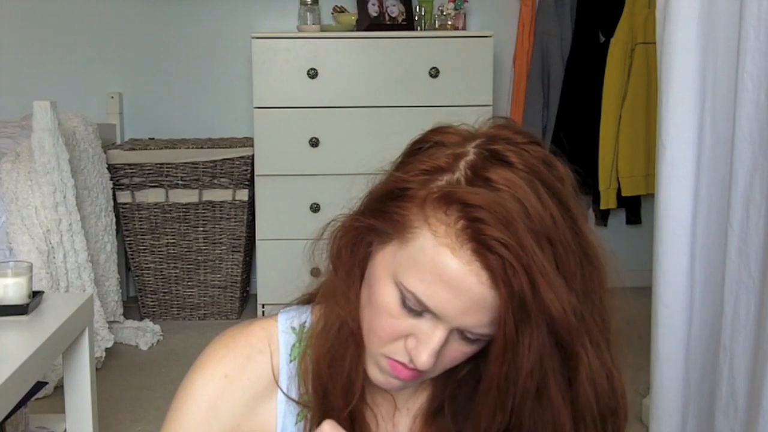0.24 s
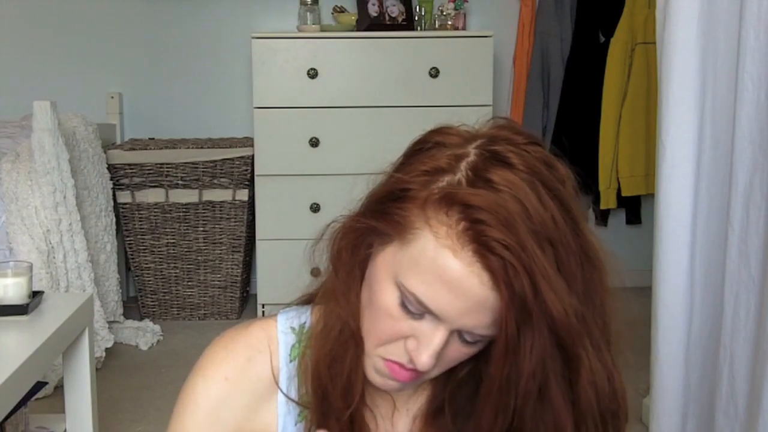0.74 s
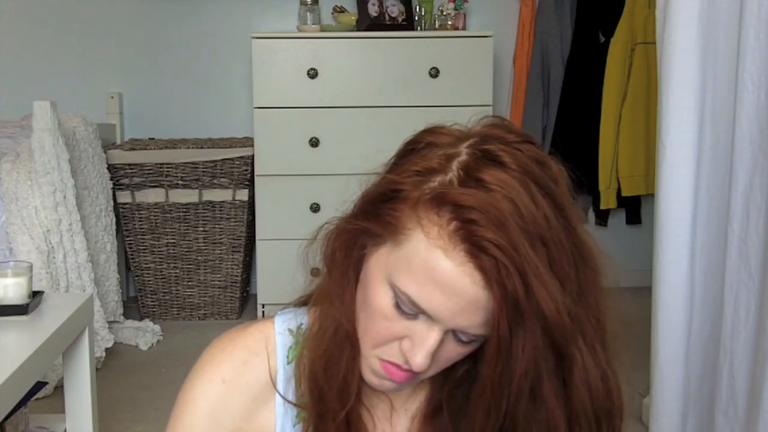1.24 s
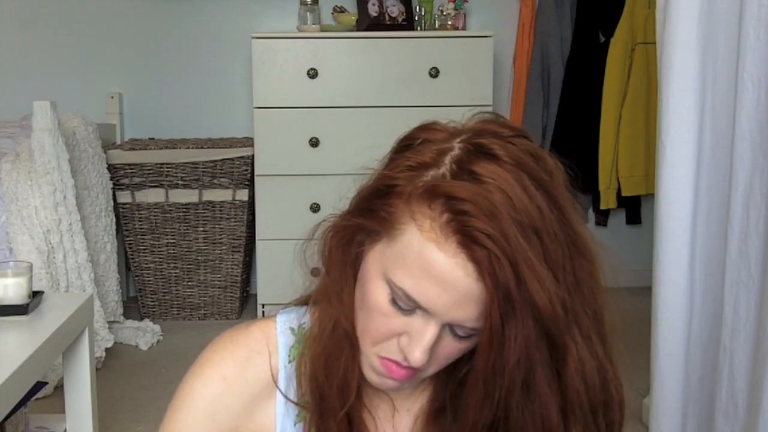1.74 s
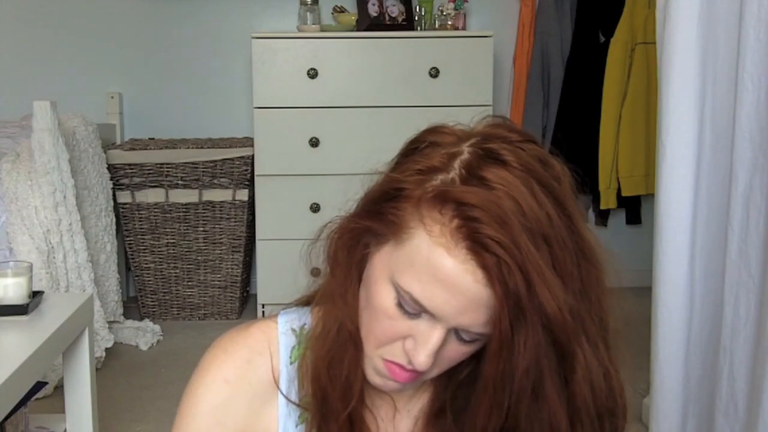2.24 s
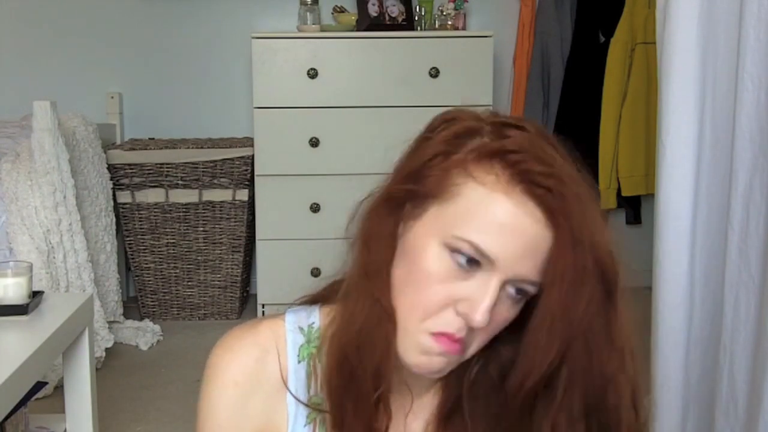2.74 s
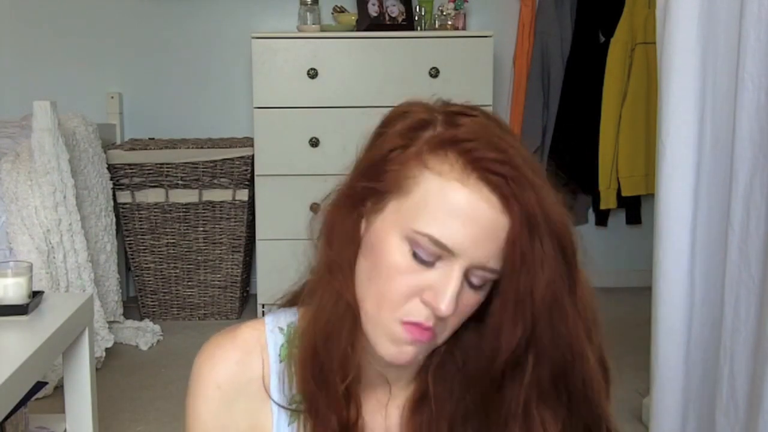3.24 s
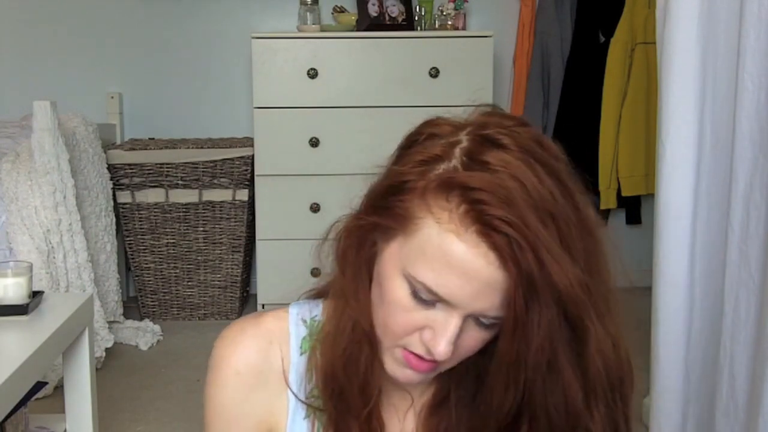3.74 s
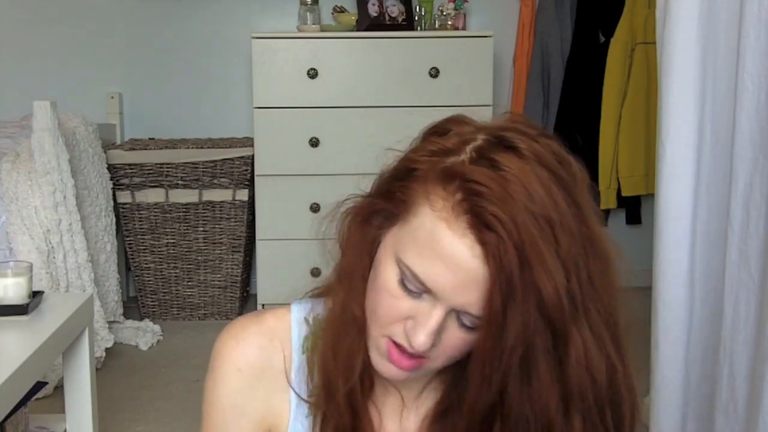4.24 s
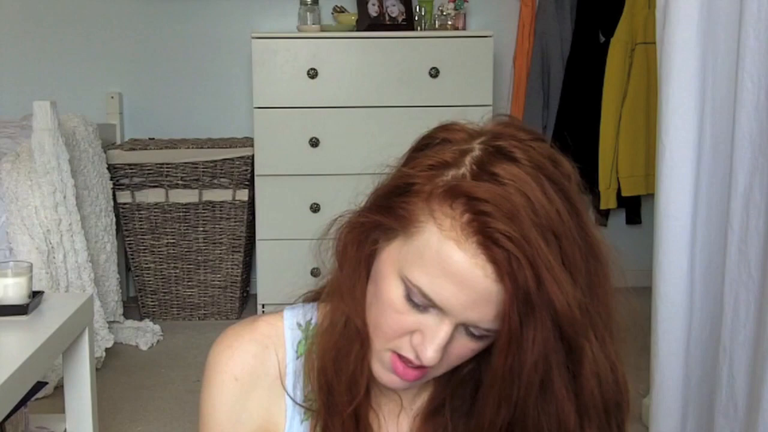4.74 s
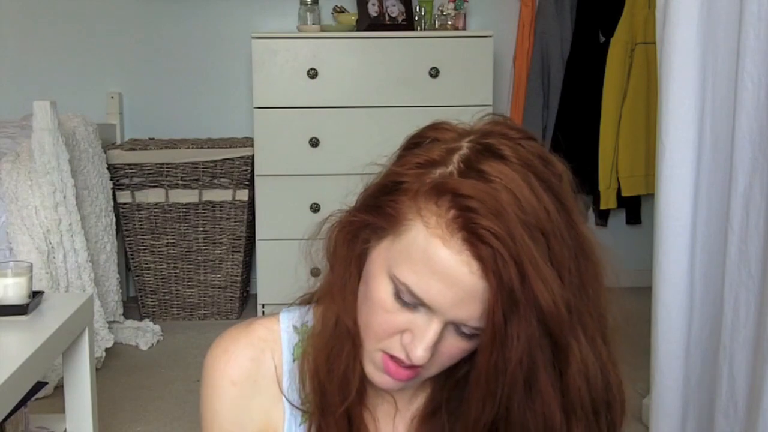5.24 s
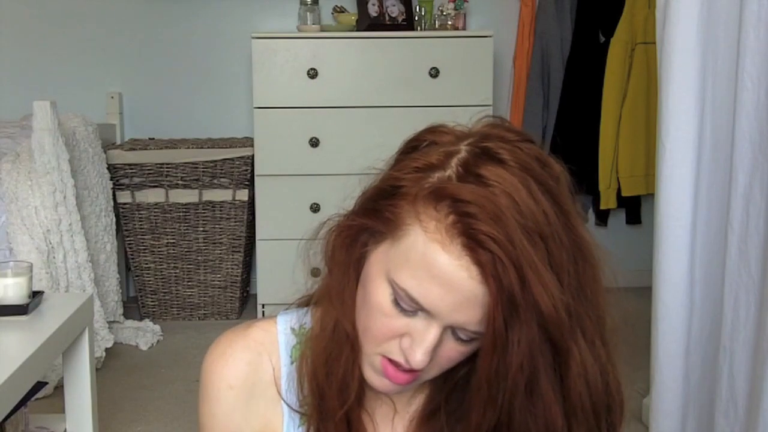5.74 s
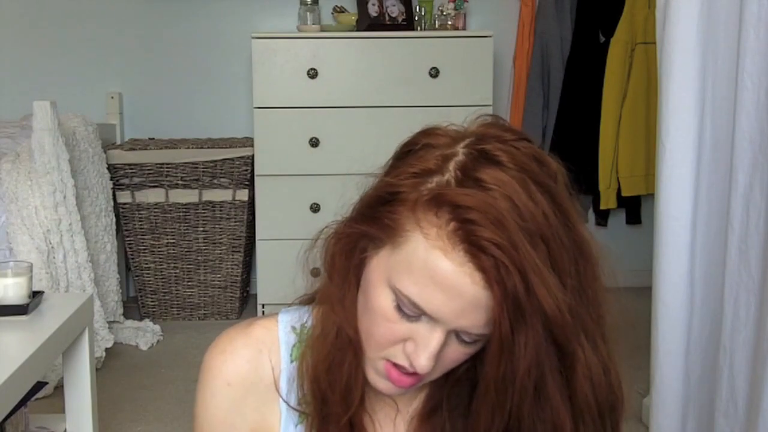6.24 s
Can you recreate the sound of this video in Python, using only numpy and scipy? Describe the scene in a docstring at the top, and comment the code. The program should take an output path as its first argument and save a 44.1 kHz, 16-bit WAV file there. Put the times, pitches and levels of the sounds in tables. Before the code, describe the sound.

Dry, gritty buffing of nails, thin and bright, runs at about thirty tiny strokes a second in bursts under half a second long. After a nearly silent pause it comes back louder, ticks once clearly, breaks into spaced flicks, then returns to short bouts until the end. The microphone is near, the bedroom barely echoes, and a faint rumble, wavering whistle and far engine drone sit underneath.

```python
"""A nail buffer scrubs fingernails in very quick short strokes, heard close up in a small quiet bedroom.
Grit grains catch on the nail and ring the foam block and the nail plate; each grip changes the colour.
Now and then the block's edge ticks against the nail tip. Near reflections and a short tail follow both.
Behind: filtered-noise boom, rumble and 1 kHz whistle, sliding sines for far traffic, a steady sine buzz
with a thin high whine, shaped noise for microphone hiss and a faint low noise that differs left and right."""
import sys
import numpy as np
from scipy import signal
from scipy.fft import rfft, irfft
from scipy.io import wavfile
from scipy.ndimage import uniform_filter1d

SR = 44100
rng = np.random.default_rng(int(sys.argv[2]) if len(sys.argv) > 2 else 0)


def wrap_up_sound(samples):
    """Save the sound to the file named by the first command line argument, as 16-bit audio."""
    columns = np.atleast_2d(samples).T
    # keep every value between -1 and 1, then stretch to whole-number steps
    tamed = np.clip(columns, -1, 1)
    steps = np.round(tamed * 32767).astype(np.int16)
    wavfile.write(sys.argv[1], SR, steps)


N = 285768  # samples in the scene


def gain_of(db):
    """Amplitude factor of a level in dB."""
    return 10 ** (np.asarray(db) / 20)


def evened(x):
    """The signal brought to an rms of 1."""
    return x / np.sqrt(np.mean(x ** 2) + 1e-20)


def read(points, hz):
    """A curve read off between its points along log frequency."""
    f, value = np.transpose(points)
    return np.interp(np.log(hz + 1), np.log(f + 1), value)


def coloured(spectrum):
    """Noise whose power per Hz follows the spectrum above 18 Hz."""
    hz = np.fft.rfftfreq(N, 1 / SR)
    white = rfft(rng.standard_normal(N))
    shaped = white * gain_of(read(spectrum, hz)) * (hz > 18)
    return irfft(shaped, N) * np.sqrt(SR / 2)  # white noise spreads its power over SR / 2


def narrow(noise, hz, width):
    """Noise through two equal two-pole resonances in a row, leaving a band that wavers around one pitch."""
    peak = signal.iirpeak(hz, hz / width, SR)
    return evened(signal.lfilter(*peak, signal.lfilter(*peak, noise)))


def body(groups, size=512):
    """Causal ring of mode groups (modes, dB, pitch factor): powers add, each group at its own level."""
    hz = np.abs(np.fft.fftfreq(size, 1 / SR))
    power = 1e-16
    for modes, db, factor in groups:
        peaks = sum(gain_of(2 * d) / (1 + ((hz - f * factor) / w) ** 2) ** 2 for f, w, d in modes)
        power = power + gain_of(2 * db) * peaks / peaks.mean()
    # minimum phase: the ring starts at once and dies away
    minimum_phase = np.exp(signal.hilbert(np.log(power) / 2).conj())
    return np.fft.ifft(minimum_phase).real[:size // 2]


# Microphone hiss shared by both channels. Each row: frequency in Hz, level in dB per Hz.
HISS_SPECTRUM = [(300, -100), (1000, -101), (2000, -103), (4000, -106), (8000, -110), (11000, -113),
                 (14000, -114), (15700, -117)]


def hiss():
    """Microphone noise, the same in both channels, sloping down towards the treble."""
    return coloured(HISS_SPECTRUM)


# Faint low noise of opposite sign left and right, fading out towards the treble.
# Each row: frequency in Hz, level in dB per Hz.
SIDE_NOISE_SPECTRUM = [(30, -89), (100, -92.5), (270, -95.5), (500, -105), (1280, -114), (2500, -122),
                       (4000, -135), (15500, -145)]


def side_noise():
    """Faint low noise of opposite sign left and right, fading out towards the treble."""
    return coloured(SIDE_NOISE_SPECTRUM) * np.array([[1], [-1]])


# Steady electrical buzz and high whine. Each row: frequency in Hz, level in dB rms.
BUZZ_TONES = [(239.8, -62), (938, -83), (12107.8, -89), (12227.6, -85), (12347.3, -88), (13906, -95),
              (14866, -93)]


def electrical_buzz():
    """Steady sines with random starting phases."""
    t = np.arange(N) / SR
    buzz = np.zeros(N)
    for hz, db in BUZZ_TONES:
        phase = 2 * np.pi * (hz * t + rng.random())
        buzz += gain_of(db) * np.sqrt(2) * np.sin(phase)  # root 2 turns rms into peak
    return buzz


# Level of the low noise over time: randomly wandering deep boom, nearly steady rumble.
# Each row: time in seconds, deep boom in dB rms, rumble in dB rms.
LOW_NOISE_LEVELS = [(0, -59.5, -55), (1.2, -59.5, -54.5), (2.0, -62.5, -53), (3.1, -51, -52),
                    (3.7, -58, -51.5), (4.2, -58.5, -51.5), (4.8, -53.5, -53), (5.5, -57, -53),
                    (6.48, -53, -53)]
# Colour of the rumble. Each row: frequency in Hz, relative level in dB per Hz.
RUMBLE_SPECTRUM = [(25, -0.5), (55, -2.5), (88, -6.5), (130, -2), (200, -8), (330, -10), (460, -14),
                   (520, -17.5), (800, -22.5), (1400, -28.5), (2500, -46.5)]
# Room modes humming in the rumble. Each row: frequency in Hz, width of each of two resonances in Hz,
# level in dB against the plain rumble.
ROOM_MODES = [(151.1, 20.4, -9), (186.3, 21.6, -9), (283, 18, -12.5), (456.2, 17, -20.5), (848, 10, -27.5)]


def room_tone():
    """Filtered noise: a randomly wandering deep boom and a nearly steady rumble with its room modes."""
    s, boom_db, rumble_db = np.transpose(LOW_NOISE_LEVELS)
    t = np.arange(N) / SR
    air = rng.standard_normal(N)
    boom = narrow(air, 85.8, 32)
    hums = sum(gain_of(db) * narrow(air, hz, width) for hz, width, db in ROOM_MODES)
    rumble = evened(evened(coloured(RUMBLE_SPECTRUM)) + hums)
    return gain_of(np.interp(t, s, boom_db)) * boom + gain_of(np.interp(t, s, rumble_db)) * rumble


# Rise and fall of the whistle. Each row: time in seconds, level in dB rms.
WHISTLE_LEVELS = [(0, -81), (1.2, -75.5), (1.7, -78), (2.8, -72), (3.4, -76), (3.7, -65.5), (3.85, -74),
                  (4.0, -64), (4.15, -73), (4.3, -64.5), (4.4, -73), (4.5, -63), (4.62, -72), (5.0, -72.5),
                  (5.4, -70.5), (6.48, -77.5)]


def whistle():
    """A wavering whistle: noise through sharp resonances near 1 kHz."""
    level_db = np.interp(np.arange(N) / SR, *np.transpose(WHISTLE_LEVELS))
    return gain_of(level_db) * narrow(rng.standard_normal(N), 1051, 30)


# Engine notes of far traffic. Each row: start in seconds, end in seconds, first pitch in Hz, last pitch
# in Hz, level in dB rms at mid-swell before it wavers.
ENGINE_NOTES = [(.2, 1.9, 362, 348.3, -66.5), (1.301, 1.87, 140, 191.8, -59.5),
                (1.9, 3.07, 339.6, 318, -64), (2.65, 3.5, 468, 446.4, -67), (3.85, 4.7, 407, 387.6, -67)]


def traffic(waver_db=4.0):
    """Sliding sines swell and fade while slow noise makes their level waver."""
    t, out = np.arange(N) / SR, np.zeros(N)
    for start, end, first_hz, last_hz, db in ENGINE_NOTES:
        progress = np.clip((t - start) / (end - start), 0, 1)
        waver = evened(uniform_filter1d(rng.standard_normal(N), 3000))
        turns = np.cumsum(first_hz + (last_hz - first_hz) * progress) / SR
        swell = np.sqrt(2 * np.sin(np.pi * progress).clip(0))
        out += gain_of(db + waver_db * waver) * swell * np.sin(2 * np.pi * turns)
    return out


# Near reflections off desk and body. Each row: delay in ms, level in dB against the direct sound.
NEAR_ECHOES = [(2.5, -25.5), (6, -14), (11, -19)]
# Decay of the room's tail. Each row: frequency in Hz, time to fall by 60 dB in seconds.
WALL_DECAY = [(2000, 0.29), (6000, 0.11), (10000, 0.067), (15000, 0.061)]


def room(x, walls_db=-13, turns_per_s=3.):
    """A few near reflections, and a short diffuse tail that keeps changing as the hands move."""
    near = np.zeros(1024)
    near[0] = 1
    for ms, db in NEAR_ECHOES:
        near[round(ms * SR / 1000)] += gain_of(db)
    # three noise tails, the decay set per frequency
    hz, t, noise = signal.stft(rng.standard_normal((3, SR // 4)), SR, nperseg=128)
    decay = gain_of(-60 * t / read(WALL_DECAY, hz)[:, None])
    tails = signal.istft(noise * decay, SR, nperseg=128)[1]
    tails = tails / np.linalg.norm(tails[0])
    # the sound circles steadily through the tails at constant total power
    turns = turns_per_s * np.arange(N) / SR + np.arange(3)[:, None] / 3
    shares = np.cos(2 * np.pi * turns) * np.sqrt(2 / 3)
    wet = signal.oaconvolve(x * shares, tails, axes=1)[:, :N].sum(0)
    return signal.oaconvolve(x, near)[:N] + gain_of(walls_db) * wet


# The block's edge catches the nail tip with a single tick.
# Each row: time in seconds, peak level in dB before the room.
EDGE_TICKS = [(2.0273, -26), (3.233, -36), (3.4117, -36), (3.4135, -22), (3.4171, -14), (3.4198, -19.5),
              (3.8465, -33), (4.1382, -35), (5.017, -28)]


def edge_ticks():
    """Each tick is one blow, ringing the scratch, nail, grit and foam modes together."""
    blows = np.zeros(N)
    for s, db in EDGE_TICKS:
        blows[round(s * SR)] = gain_of(db)
    ring = body([(SCRATCH_MODES, 0, 1), (NAIL_MODES, -6., 1), (GRIT_MODES, -5., 1), (FOAM_MODES, -14., 1)])
    return signal.oaconvolve(blows, ring / abs(ring).max())[:N]


def pressure(ms, most_pressure=0.59, rise_power=0.69, fall_power=0.65):
    """The stroke swells to its moment of most pressure, a share of its length, and lets go."""
    u = np.linspace(0, 1, round(ms * SR / 1000))
    up = np.clip(u / most_pressure, 0, 1)
    down = np.clip((1 - u) / (1 - most_pressure), 0, 1)
    return np.sin(np.pi / 2 * up) ** rise_power * np.sin(np.pi / 2 * down) ** fall_power


def catching_grains(grains_per_s=9000, size_db=2.5, chatter_db=1.0):
    """Random clicks of uneven size; chatter swells them in clumps as the block judders within a stroke."""
    size = gain_of(size_db * np.minimum(rng.exponential(1, N), 3.2)) * rng.choice([-1, 1], N)
    grains = evened(size * (rng.random(N) < grains_per_s / SR))
    chatter = evened(uniform_filter1d(rng.standard_normal(N), 60))
    return evened(grains * gain_of(chatter_db * chatter))


# Strokes of the buffer. Each row: start in seconds, length in ms, scratch level in dB at most pressure.
STROKE_TIMES = [(0.0, 12, -45), (0.021, 20.3, -44), (0.046, 22.8, -45.0), (0.077, 21, -42.5),
                (0.098, 24, -45.5), (0.131, 23, -47.5), (0.154, 26, -45.5), (0.188, 23, -45.2),
                (0.219, 24.4, -45.5), (0.25, 26.6, -44.0), (0.282, 23, -42.5), (0.312, 27, -47.5),
                (0.342, 25.3, -44.5), (0.373, 24.1, -46.0), (0.399, 22.3, -46), (0.618, 18, -53),
                (0.642, 38.4, -49.5), (0.682, 36, -45), (0.719, 20, -52.0), (0.786, 19, -57.5),
                (0.807, 24.6, -51.5), (0.84, 21, -44), (0.865, 27, -44), (0.897, 25.5, -44.5),
                (0.923, 35, -48), (0.957, 17.7, -52), (1.125, 31, -47), (1.164, 24, -50),
                (1.194, 22, -45.5), (1.226, 26, -49.0), (1.258, 26, -49), (1.29, 23, -45),
                (1.319, 25.3, -46), (1.355, 24.4, -47.5), (1.384, 17.4, -45), (1.662, 27, -54),
                (1.705, 24.1, -53), (1.743, 27, -49.5), (1.784, 27, -48.5), (1.822, 27.4, -47),
                (1.858, 31.1, -45.5), (1.899, 28, -48.5), (1.937, 32.6, -45.5), (1.976, 30, -51.5),
                (2.02, 11, -40), (2.223, 16.5, -55), (2.247, 19.9, -46.5), (2.276, 20.3, -46),
                (2.302, 19.9, -46.5), (2.328, 20.4, -45), (2.353, 18.6, -45), (2.379, 17.4, -38),
                (2.65, 20.3, -56.5), (2.742, 11.9, -63.5), (2.767, 7.1, -64), (2.781, 19.0, -69.2),
                (2.873, 33, -69.5), (2.914, 13.9, -65), (2.978, 23, -71.5), (3.008, 20, -60),
                (3.075, 24, -61), (3.101, 14, -64.5), (3.118, 9.5, -75), (3.172, 14, -64), (3.189, 22, -50),
                (3.227, 12.6, -46.5), (3.25, 28, -59.8), (3.282, 21.5, -49.5), (3.317, 21, -42.5),
                (3.351, 20.4, -46), (3.379, 24.8, -40), (3.416, 10, -36), (3.484, 24, -42.5),
                (3.512, 26, -47.5), (3.544, 22.8, -41.5), (3.571, 23, -42), (3.601, 22.6, -40),
                (3.631, 23, -40.5), (3.66, 27.3, -38.5), (3.699, 16.0, -45), (3.764, 32, -42.9),
                (3.82, 10.5, -63), (3.835, 21, -35.0), (3.904, 3.3, -58), (3.912, 9.8, -34.5),
                (3.96, 4.8, -67), (3.968, 13, -34.5), (4.019, 6.3, -59.5), (4.028, 10.6, -31),
                (4.074, 4.4, -60.5), (4.079, 17.3, -34.5), (4.134, 12, -32.5), (4.357, 11.0, -66),
                (4.39, 15, -66.5), (4.412, 17, -39.5), (4.437, 24.7, -38), (4.465, 24.5, -38.5),
                (4.497, 21.6, -37.5), (4.524, 19, -38.5), (4.552, 17.2, -35.5), (4.728, 7.7, -61),
                (4.764, 13, -47), (4.793, 19.5, -49.5), (4.821, 20, -55), (4.852, 19.7, -41.5),
                (4.879, 18.4, -43.5), (4.911, 19.6, -40), (4.938, 19.6, -43.5), (4.969, 12, -44.5),
                (4.993, 27, -45.5), (5.014, 6.7, -53), (5.287, 10.1, -67), (5.308, 20, -50.5),
                (5.342, 19.0, -45), (5.372, 16.5, -45), (5.403, 17, -40.0), (5.442, 7.5, -53),
                (5.516, 5, -65), (5.534, 10, -64), (5.555, 22.4, -43.0), (5.587, 24.1, -43),
                (5.636, 7.8, -49.5), (5.852, 15, -69.5), (5.871, 26, -62.5), (5.942, 25.3, -64.0),
                (5.976, 27, -51.5), (6.016, 21, -43.5), (6.049, 24.5, -44.5), (6.086, 19, -43),
                (6.118, 20.8, -41), (6.152, 18, -44.5), (6.193, 17.7, -48), (6.229, 31, -44),
                (6.268, 22, -39.5), (6.303, 26.6, -42.5), (6.337, 20, -43.5), (6.366, 24.3, -36.0)]
# Grips on a nail, each held for a bout of strokes. Each row: start in seconds; foam block, nail plate and
# fine grit in dB against the scratch in a usual stroke; pitch factors of scratch, foam and nail; then the
# swing between push and pull: scratch pitch factor, foam and nail in dB, grit in dB.
NAIL_GRIPS = [(0, -13, -11.5, 0, .98, 0.98, .96, 0.055, 1.5, -.6),
              (.55, -12, -5, -6, 1.01, .93, 0.98, .001, 0.3, .1),
              (.76, -10.5, -3.5, -3.5, 1.01, 0.96, 1, -0.013, -1.2, -1),
              (1.05, -11, -4, -2.5, 1.065, 0.98, 0.99, 0.0029, 1.1, -2),
              (1.55, -11.5, -6.5, -6, 1.07, 0.94, 1.03, 0.027, -0.3, .1),
              (2.15, -6.5, 0, -1, 1.006, .96, 1, -.02, -.5, -1),
              (2.55, -16, -5.5, -7, 0.96, .92, 1, 0.015, 3, -1),
              (3.18, -12.5, -7.5, -6, 1.06, 0.97, 1.08, 0.0023, -1.3, .1),
              (3.46, -13.5, -8, -5, 1.005, 0.99, 1.02, 0.0041, -0.5, -1),
              (3.74, -15, -10, -9, 1, .98, .99, 0.0097, -0.9, .1),
              (4.28, -13, -9.5, -5.5, 0.98, 1, 0.955, 0.0059, 0, -1),
              (4.66, -8, 1.5, -10.5, 0.98, 0.97, 1, -0.053, -0.6, -1),
              (5.2, -9, 2.5, -7, 0.96, 0.95, 1.01, -.03, 0.4, -1),
              (5.49, -7, 1.3, -10, .97, .97, 1.01, -0.0074, -0.6, -3),
              (5.76, -15, -8.5, -12, 1.004, 0.96, 1, -0.015, -1, .1),
              (6.18, -20, -6.5, -14, 1.006, 1, 0.952, .001, -0.2, .1)]
# Foam, nail and grit in turn: dB each falls behind the scratch for each dB above a usual stroke.
PRESSURE_LAG = [0.56, 0.22, .1]
# Modes the grains ring: the scratch, the foam block, the nail plate and the fine grit.
# Each row: frequency in Hz, half-width in Hz at 6 dB down, relative level in dB; pitch factors may shift them.
SCRATCH_MODES = [(7940, 1100, -7), (9134, 640, 10), (9560, 370, -1), (10730, 700, 1), (11260, 940, 3)]
FOAM_MODES = [(1813, 100, 4), (2326, 444, 7.5), (3430, 320, -1.5), (3840, 580, 9), (4500, 300, 3)]
NAIL_MODES = [(5680, 1400, -8.5), (5460, 640, 2), (7155, 270, 0), (7310, 770, 5.5)]
GRIT_MODES = [(13200, 300, 0), (13500, 810, -5), (14900, 2600, 0)]


def buffer_strokes(usual_db=-46.5, scatter=.015, scatter_db=1.5):
    """Each stroke presses grains into the nail and rings the modes as its grip and direction leave them."""
    grains = catching_grains()
    grip_starts = [row[0] for row in NAIL_GRIPS]
    stroke_starts = [row[0] for row in STROKE_TIMES]
    grip = np.searchsorted(grip_starts, stroke_starts, "right") - 1
    # push, pull, push .. from the start of each grip
    way = (-1.) ** (np.arange(len(grip)) - np.searchsorted(grip, grip))
    # no two strokes land alike
    slips = 1 + scatter * rng.standard_normal((len(grip), 3))
    slips_db = scatter_db * rng.standard_normal((len(grip), 3))
    out = np.zeros(N)
    for (s, ms, db), k, w, slip, slip_db in zip(STROKE_TIMES, grip, way, slips, slips_db):
        (_, foam_db, nail_db, grit_db, scratch_pitch, foam_pitch, nail_pitch,
         swing, swing_db, grit_swing_db) = NAIL_GRIPS[k]
        levels_db = np.array([foam_db + w * swing_db, nail_db + w * swing_db, grit_db + w * grit_swing_db])
        levels_db = levels_db - np.multiply(PRESSURE_LAG, db - usual_db) + slip_db
        pitches = slip * [scratch_pitch + w * swing, foam_pitch, nail_pitch]
        modes = [SCRATCH_MODES, FOAM_MODES, NAIL_MODES, GRIT_MODES]
        ring = body(zip(modes, [0, *levels_db], [*pitches, 1]))
        start = round(s * SR)
        push = gain_of(db) * pressure(ms)
        sound = np.convolve(push * grains[start:start + len(push)], ring)
        out[start:start + len(sound)] += sound
    return out


def scene():
    """The buffer and its ticks in the room, over the background."""
    background = hiss() + side_noise() + electrical_buzz() + room_tone() + whistle() + traffic()
    return background + room(buffer_strokes() + edge_ticks())


# Constant offset of the converter. Each row: one channel, left then right, as a share of full scale.
CONVERTER_OFFSET = [
    [.0113],
    [.0374],
]


def record(dry, edge_hz=15750):
    """The converter cuts everything above its band edge and adds its constant offset."""
    low_pass = signal.firwin(801, edge_hz, window=("kaiser", 9), fs=SR)
    return CONVERTER_OFFSET + signal.oaconvolve(dry, low_pass[None], "same")


dry = scene()
out = record(dry)
wrap_up_sound(out)
```